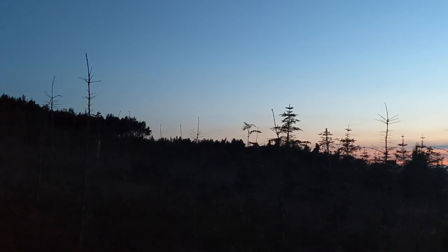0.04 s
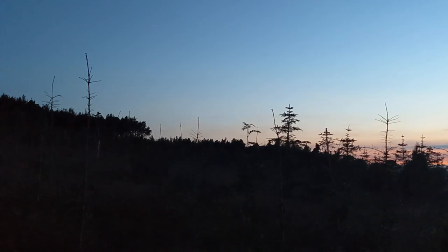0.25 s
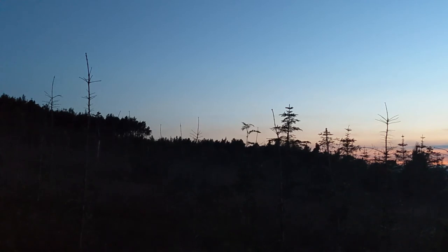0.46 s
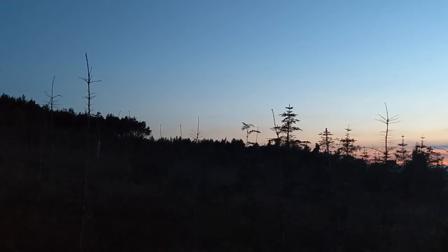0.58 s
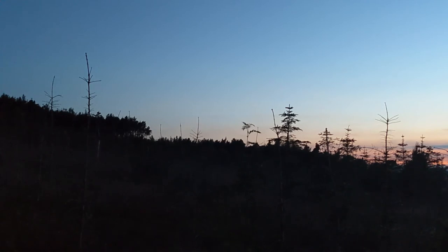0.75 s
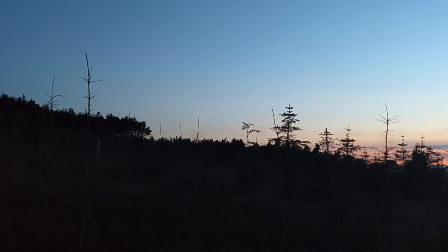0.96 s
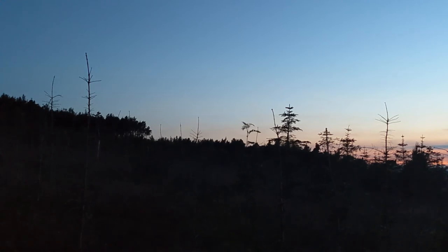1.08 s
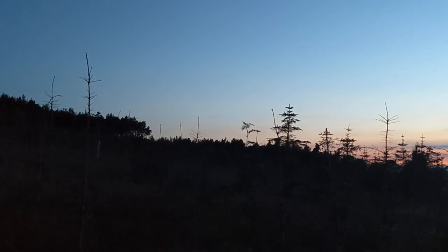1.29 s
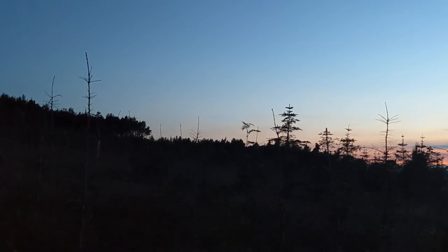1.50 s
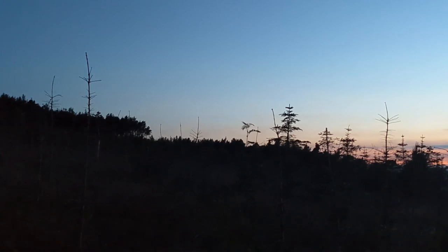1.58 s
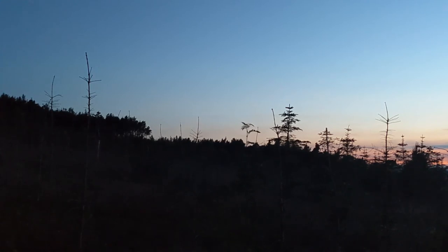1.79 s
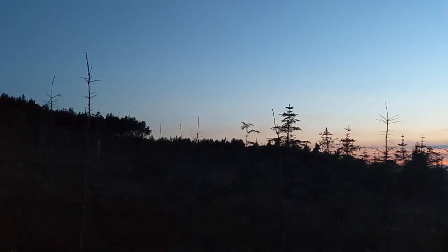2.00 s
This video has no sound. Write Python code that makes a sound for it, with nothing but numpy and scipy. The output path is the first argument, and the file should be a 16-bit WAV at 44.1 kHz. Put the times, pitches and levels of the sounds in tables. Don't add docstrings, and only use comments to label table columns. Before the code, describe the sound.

A distant nightjar churrs in a steady, dry mechanical trill at dusk while wind thumps the microphone

```python
import sys
import numpy as np
from scipy import signal
from scipy.fft import rfft, irfft, next_fast_len
from scipy.io import wavfile
from scipy.ndimage import uniform_filter1d, map_coordinates

SR = 44100
rng = np.random.default_rng(int(sys.argv[2]) if len(sys.argv) > 2 else 0)


def persist_wave(psi):
    counts = np.round(np.clip(psi, -1, 1) * 32767).astype(np.int16)
    wavfile.write(sys.argv[1], SR, np.atleast_2d(counts).T)


def gain_from_db(level_db):
    decades = np.asarray(level_db, float) / 20
    return 10 ** decades


N = 90404
PAD = SR // 4


def unit(x):
    return x / np.sqrt(np.mean(x ** 2) + 1e-20)


def add(track, s, sound):
    i = max(round(s * SR) + PAD, 0)
    track[..., i:i + sound.shape[-1]] += sound


def noise(colour):
    m = next_fast_len(N + 8192)
    hz = np.fft.rfftfreq(m, 1 / SR)
    f, db = np.transpose(colour)
    gain = gain_from_db(np.interp(np.log(hz + 1), np.log(f + 1), db, left=-120))
    return unit(irfft(rfft(rng.standard_normal(m)) * gain, m)[:N])


def wobble(rate, size=N):
    knots = rng.standard_normal(size // 200)
    return map_coordinates(knots, [np.arange(size) * rate / SR], mode="nearest")


def bell(x):
    return np.exp(-.5 * x ** 2)


def whistle(t, hz, span, lag_s, tilt_db_per_octave, head, phase):
    rise_s, fade_s, tail_s, start_s = np.array([.0024, .0015, .0056, .0052]) * span
    u = t - lag_s
    since_start = u + start_s
    shape = bell(u / np.where(u < 0, rise_s, fade_s))
    shape = shape + gain_from_db(-14) * bell((u - tail_s) / rise_s)
    shape = shape * (.5 + .5 * np.tanh(since_start / .0006))
    pitch = hz[0] - 650 * np.tanh(u / .0053)
    pitch = pitch + head * np.exp(-np.clip(since_start, 0, 1) / .0012)
    cycles = np.cumsum(pitch) / SR - pitch[0] * lag_s + phase
    tilt_db = tilt_db_per_octave * np.log2(pitch / hz[1])
    waver_db = 1.5 * wobble(300, size=3000)[:len(t)]
    return gain_from_db(tilt_db + waver_db) * shape * np.sin(2 * np.pi * cycles)


def tree_haze(direct):
    t = np.arange(SR // 2) / SR
    t60_s = .45
    tail = rng.standard_normal((2, len(t))) * gain_from_db(-60 * t / t60_s) * (t > .004)
    echo = signal.fftconvolve(direct, tail / np.linalg.norm(tail[0]), axes=1)
    return gain_from_db(-10.5) * echo[:, :direct.shape[1]]


# t/s, level/dB
QUICK_NOTES = [
    (.0005, -69.5),
    (0.0245, -68),
    (0.0485, -69.5),
    (0.072, -65.5),
    (0.0978, -65.5),
    (0.129, -65),
]
# t/s, level/dB
STEADY_NOTES = [(0.1698, -65.5), (0.2077, -64), (0.245, -63.5), (0.2837, -64.5), (0.3199, -64.9),
                (0.3574, -65.0), (0.3943, -63.9), (0.432, -64), (0.4701, -64.5), (0.5059, -61.5),
                (0.5444, -60.5), (0.5812, -59), (0.618, -62), (0.6544, -60.5), (0.691, -60.5),
                (0.7292, -59), (0.766, -57.5), (0.803, -61.5), (0.8407, -60), (0.8779, -60.5),
                (0.9149, -61.1), (0.9526, -59), (0.9884, -60), (1.0279, -58.5), (1.0648, -57.5),
                (1.1027, -57.5), (1.139, -58), (1.1753, -61), (1.2137, -58.5), (1.2507, -58.5),
                (1.2869, -58.5), (1.3241, -57.5), (1.36, -58.0), (1.3978, -57), (1.4364, -56), (1.473, -58),
                (1.5117, -59), (1.5495, -57.5), (1.5877, -57.5), (1.6237, -57.5), (1.6607, -59.1),
                (1.6978, -59), (1.7351, -59.6), (1.7728, -60.5), (1.809, -58.5), (1.847, -61),
                (1.8832, -60), (1.9185, -59.5), (1.956, -61.5), (1.994, -59.7), (2.0282, -61.5)]
# start t/s, end t/s
LOST_CALL = [
    (.5375, .5425),
    (1.5123, 1.5200),
]


def nightjar():
    left_lag_s, left_pan_db = -.00012, -1
    notes = [(s, db, 1690, .62, 0) for s, db in QUICK_NOTES]
    notes += [(s, db, 1755, 1, 330) for s, db in STEADY_NOTES]
    out, t = np.zeros((2, N + SR)), np.arange(-600, 900) / SR
    for s, db, hz, span, head_hz in notes:
        detune, phase, scatter, jitter, mood = rng.standard_normal(5)
        pitches = (hz * (1 + .02 * detune), hz)
        head = head_hz * (1 + .4 * mood)
        for side, sign in enumerate((.5, -.5)):
            tilt = sign * 9 + 2 * mood
            note = whistle(t, pitches, span, sign * left_lag_s, tilt, head, phase)
            level = gain_from_db(db + .3 * scatter + sign * left_pan_db)
            add(out[side], s + .0002 * jitter + t[0], level * note)
    direct = out[:, :N + PAD]
    direct[:, :PAD] += .5 * direct[:, PAD:2 * PAD]
    haze = tree_haze(direct)
    near_trunk = gain_from_db(-15) * np.roll(direct, round(.011 * SR), axis=1)
    t = np.arange(direct.shape[1]) / SR - 1 / 4
    kept = np.prod([(t < a) | (t > b) for a, b in LOST_CALL], axis=0)
    return (kept * direct + near_trunk + haze)[:, PAD:]


# t/s, peak level/dB, f/Hz, T60/s, left over right/dB
TICK_RINGS = [(1.1653, -51, 870, .009, 4), (1.1653, -48, 1940, .004, 0), (1.1645, -66.5, 8160, .011, 3),
              (1.1655, -59.5, 435, .021, -1), (1.337, -57.5, 6000, .011, 7), (1.336, -60, 7040, .008, 10),
              (1.461, -60, 1230, .008, 4), (1.462, -65, 2100, .005, 4), (1.485, -64, 2000, .006, 2),
              (1.539, -57, 8300, .006, -8), (1.5392, -63, 6600, .006, 4), (1.539, -60, 15600, .004, -8),
              (1.5388, -60, 9500, .008, 0), (1.5384, -51, 1780, .006, -5), (1.8093, -57, 8200, .006, -10),
              (1.809, -60, 9700, .009, 0), (1.8093, -62, 6500, .007, 3), (1.8093, -64, 14000, .004, -10)]


def ticks():
    out, t = np.zeros((2, N + SR)), np.arange(2000) / SR
    for s, db, hz, t60, pan_db in TICK_RINGS:
        wander = .000035 * hz * np.cumsum(rng.standard_normal(len(t)))
        envelope = gain_from_db(-60 * t / t60) * (1 - np.exp(-t / .00064))
        ring = -np.sin(2 * np.pi * hz * t + wander) * envelope
        crack = gain_from_db(-11 - 60 * t / .0039) * rng.standard_normal((2, len(t))) * hz / 9000
        pan = np.array([[.5], [-.5]]) * pan_db
        add(out, s, gain_from_db(db + 4 + pan) * (ring + crack))
    return out[:, PAD:][:, :N]


def eddies(rows):
    out, stir = np.zeros(N + SR), np.zeros(N + SR)
    t = np.arange(-3000, 5000) / SR
    for s, db, hz in rows:
        shape = bell(t * hz / np.where(t < 0, .7, .9))
        pitch = hz * np.exp(-.04 * np.tanh(t * hz) + .03 * wobble(90, size=len(t)))
        cycles = np.cumsum(pitch) / SR + rng.random()
        add(out, s + t[0], gain_from_db(db + 2.5) * shape * np.sin(2 * np.pi * cycles))
        add(stir, s + t[0], gain_from_db(db) * bell(t / .016))
    return out[PAD:][:N], stir[PAD:][:N]


def buffeting(stir, floor_db, lump_rate, colour):
    lumps = gain_from_db(1.5 * wobble(lump_rate))
    return (gain_from_db(floor_db) + stir * gain_from_db(-16.5)) * lumps * noise(colour)


# t/s, level/dB, f/Hz
EXPOSED_EDDIES = [(0.021, -52, 103.4), (0.027, -49.5, 65.6), (0.028, -51.5, 176.1), (0.043, -50.5, 180.2),
                  (0.063, -46.8, 127.8), (0.069, -53.5, 83), (0.092, -54, 120.4), (0.188, -44, 109.7),
                  (0.189, -46, 175.8), (0.206, -37, 110.8), (0.208, -52, 164), (0.228, -47.5, 152.7),
                  (0.249, -41.5, 153.1), (0.274, -40.6, 205.8), (0.285, -43.1, 129.3), (0.339, -34, 178),
                  (0.341, -54, 219), (0.351, -37, 130.9), (0.371, -43, 205.5), (0.381, -46.5, 139),
                  (0.393, -46.5, 327.7), (0.406, -41, 162.3), (0.413, -47.4, 382.2), (0.415, -38, 222.8),
                  (0.428, -53, 189), (0.434, -40.5, 117.4), (0.452, -46, 176.4), (0.468, -44.5, 104.2),
                  (0.545, -41.5, 240), (0.556, -43.5, 279.6), (0.556, -37, 152.7), (0.57, -35.5, 88.9),
                  (0.572, -46, 223.7), (0.573, -30.5, 152.3), (0.579, -45, 327.6), (0.587, -40, 191.7),
                  (0.597, -45, 240), (0.63, -36, 225), (0.655, -45, 131.4), (0.657, -37.5, 383), (0.659, -27, 241.9),
                  (0.664, -30.5, 329.7), (0.677, -28.5, 141.2), (0.684, -40, 329.6), (0.689, -33, 205.7),
                  (0.694, -40.5, 327.5), (0.707, -37.6, 205.6), (0.721, -28.5, 206.5), (0.722, -43, 330.2),
                  (0.732, -38, 164.2), (0.753, -36.5, 240.8), (0.756, -39, 150.8), (0.766, -38, 205.8),
                  (0.776, -32.5, 131.5), (0.778, -47.5, 223.7), (0.8, -38.5, 129.6),
                  (0.867, -53.5, 260.6), (0.873, -45, 205.2), (0.882, -44.5, 111.1), (0.893, -53, 256),
              (0.894, -44, 163.1), (0.902, -48, 166), (0.902, -45, 88.1), (0.98, -49.5, 203.6),
              (0.998, -53.5, 140.2), (1.021, -55.3, 152.3), (1.039, -52, 152), (1.12, -37.5, 208),
              (1.131, -43.5, 151), (1.147, -51.7, 162.6), (1.159, -46.5, 222.5), (1.169, -51.1, 137.7),
              (1.196, -46.5, 95.5), (1.236, -48, 88.6), (1.256, -45, 152.7), (1.271, -52.5, 118.5),
              (1.294, -52.5, 203.6), (1.301, -45.5, 74.8), (1.306, -45.5, 129.6), (1.36, -52.4, 107.8),
              (1.375, -43.5, 102), (1.42, -50, 128.3), (1.508, -69, 110), (1.512, -68, 334.5),
              (1.635, -59.5, 65.3), (1.7, -60.5, 89.3), (1.837, -59.5, 87.2), (1.856, -64, 131.6),
              (1.903, -63, 176.3), (1.921, -64, 141), (1.985, -63, 103), (2.041, -62.5, 208),
                  (.876, -54, 400),
    (0.68, -51, 390),
    (0.36, -53.5, 460),
    (1.3, -56.5, 110),
]
# f/Hz, level/dB
EXPOSED_COLOUR = [(13, -44), (30, -4), (145, 8.5), (330, -15.5), (454, -30.5), (641, -36), (1100, -46),
                  (1430, -71), (2420, -120)]
# f/Hz, level/dB
FRINGE_COLOUR = [(150, -35), (330, -12), (480, 6), (700, -15), (1100, -25), (1500, -62)]


def left_wind():
    thumps, stir = eddies(EXPOSED_EDDIES)
    bend = np.abs(signal.hilbert(np.gradient(np.gradient(thumps))))
    fringe = gain_from_db(-45) * (bend / bend.max()) ** 1.6 * noise(FRINGE_COLOUR)
    return thumps + fringe + buffeting(stir, -76, 40.27, EXPOSED_COLOUR)


# t/s, level/dB, f/Hz
SHELTERED_EDDIES = [(0.039, -57.5, 81.2), (0.088, -59.5, 82.7), (0.207, -61, 95), (0.244, -60, 92),
                    (0.379, -69, 87), (0.399, -51.5, 90.5), (0.449, -58, 94), (0.513, -55.5, 77.6),
                    (0.587, -61, 87), (0.613, -53, 103), (0.65, -61, 75.6), (0.747, -58, 99),
                    (0.776, -69, 79), (0.91, -50.5, 75.7), (0.95, -53.5, 88), (1.061, -57, 72.7),
                    (1.208, -61, 117), (1.282, -69, 109.5), (1.35, -75, 74), (1.485, -67.5, 80),
                    (1.53, -74, 93), (1.708, -61, 86.5)]
# f/Hz, level/dB
SHELTERED_COLOUR = [(20, -19), (45, 14), (90, 4), (150, -21.5), (250, -27), (400, -99)]


def right_wind():
    thumps, stir = eddies(SHELTERED_EDDIES)
    return thumps + buffeting(stir, -67, 38, SHELTERED_COLOUR)


# f/Hz, level/dB
AIR_COLOUR = [(30, -16), (70, -3), (150, -9.5), (330, -3), (500, -13), (900, -15.5), (1500, -31.5)]
# t/s, level/dB
FAR_SWELL = [
    (0, -13),
    (1.4, -6),
    (1.55, 4.5),
    (2.05, 2.5),
]


def far_air():
    swell = gain_from_db(-84 + np.interp(np.arange(N) / SR, *np.transpose(FAR_SWELL)))
    shared = noise(AIR_COLOUR)
    return swell * (shared + np.array([noise(AIR_COLOUR), noise(AIR_COLOUR)]))


def scene():
    return nightjar() + ticks() + np.array([left_wind(), right_wind()]) + far_air()


# t/s, start level/dB, end level/dB, f/Hz, entry point/cycles
EDDY_PIECES = [
    (.5219, -40, -35, 95, 0),
    (.5297, -35.5, -24.5, 122, .5),
    (.5346, -26.5, -26, 150, .11),
]
# t/s, left jump, right jump, settling/s (negative builds up before)
STEPS = [
    (1.5123, -.0019, 0, -.003),
    (1.5285, 0, .0012, .004),
    (1.5415, .001, 0, .002),
]


def skipped():
    t, eddy = np.arange(N) / SR, np.zeros(N)
    ends = [piece[0] for piece in EDDY_PIECES[1:]] + [.5373]
    for (s, start_db, end_db, hz, entry), end in zip(EDDY_PIECES, ends):
        level = gain_from_db(np.interp(t, [s, end], [start_db, end_db]))
        heard = (t >= s) & (t < end)
        eddy += heard * level * np.cos(2 * np.pi * (hz * (t - s) + entry))
    out = eddy * np.array([[1], [-gain_from_db(-36)]])
    for s, left, right, settle in STEPS:
        u = (t - s) / settle
        out += np.array([[left], [right]]) * (u > 0) * np.exp(-np.abs(u))
    return uniform_filter1d(out, size=2)


# f/Hz, level/dB
LEFT_HISS = [(200, 1.5), (900, -5), (2900, -3.5), (5000, -6.5), (7000, -0.5), (10800, -10.5), (13000, -2.5),
             (15700, -1.5)]
# f/Hz, level/dB
RIGHT_HISS = [(200, 7), (900, 0.5), (2900, -1.5), (5000, -4), (7000, -4), (10800, -10.5), (13000, -11),
              (15700, -6)]
HISS_LEVELS = [-71, -75.5]


def preamp_hiss():
    return np.array([noise(LEFT_HISS), noise(RIGHT_HISS)]) * gain_from_db(HISS_LEVELS)[:, None]


def roll_off(x):
    return signal.sosfilt(signal.butter(12, 16170, fs=SR, output="sos"), x)


def record(dry):
    t, hz = np.arange(N) / SR, np.fft.rfftfreq(N, 1 / SR)
    low_cut = hz ** 2 / np.hypot(hz ** 2, 55 ** 2)
    heard = irfft(rfft(dry) * low_cut, N) + preamp_hiss()
    dropout = (t > .4885) & (t < .5005)
    gain = uniform_filter1d(np.where(dropout, gain_from_db(-24), 1.), size=40)
    full = rfft(heard * gain + skipped()) * (hz < 15900)
    return roll_off(irfft(full, N))


dry = scene()
out = record(dry)
persist_wave(out)
```